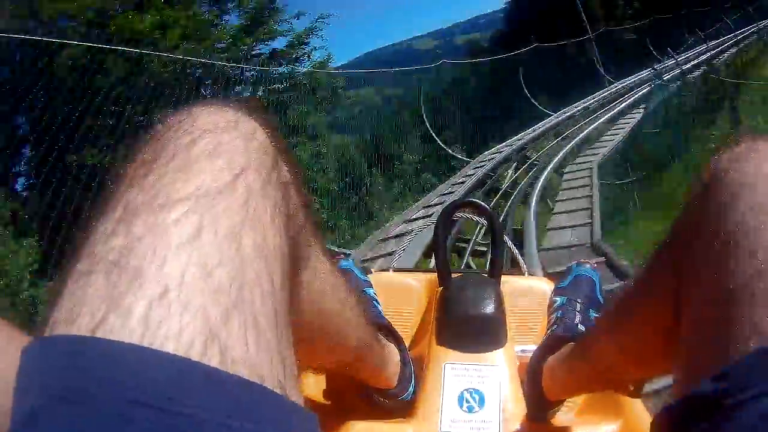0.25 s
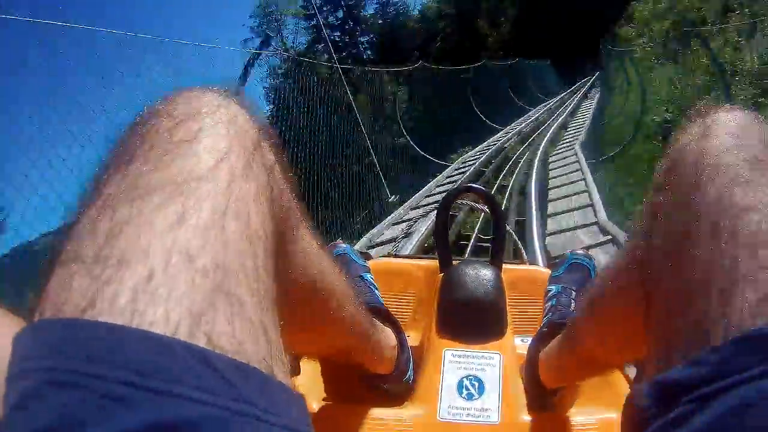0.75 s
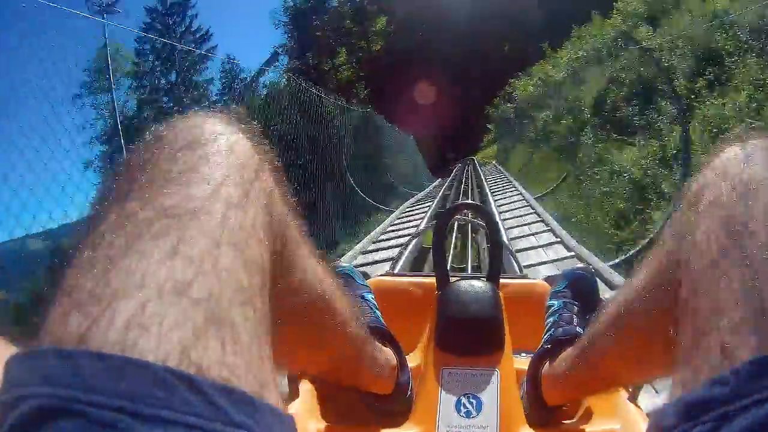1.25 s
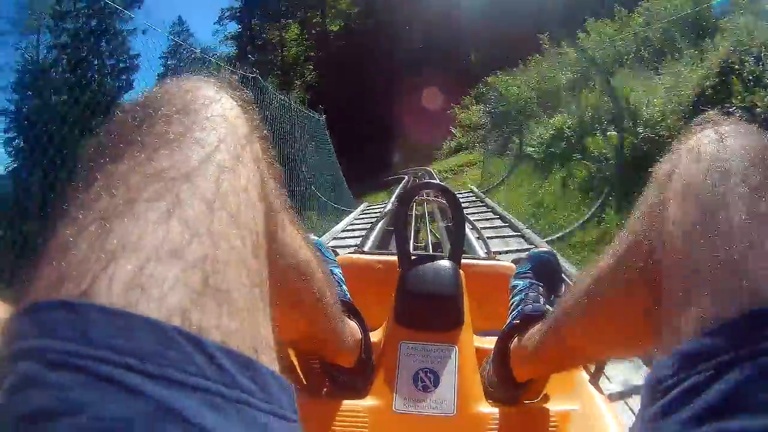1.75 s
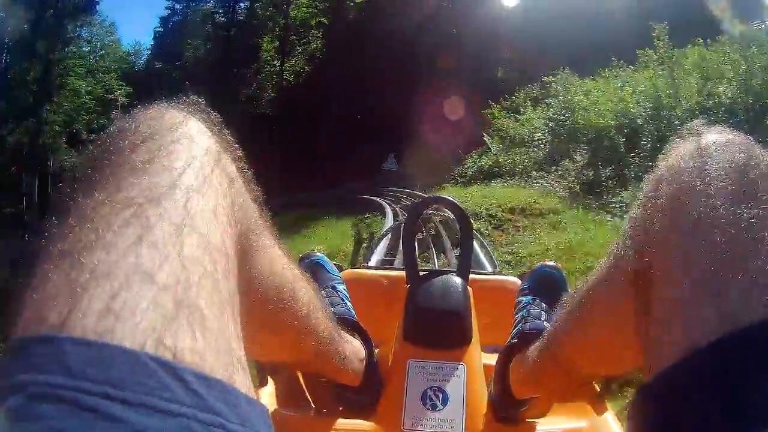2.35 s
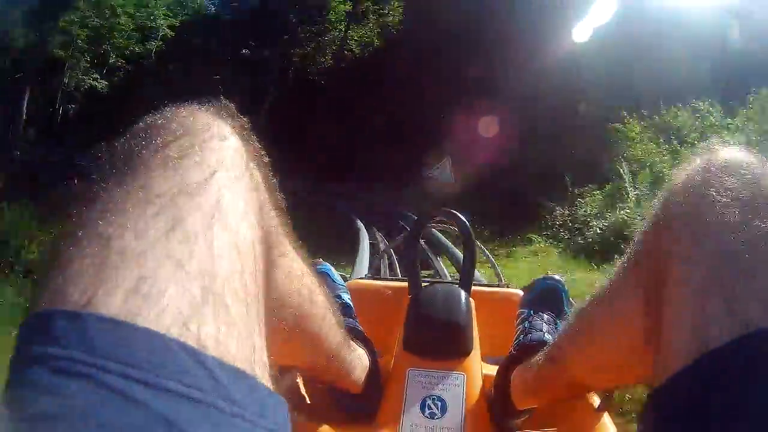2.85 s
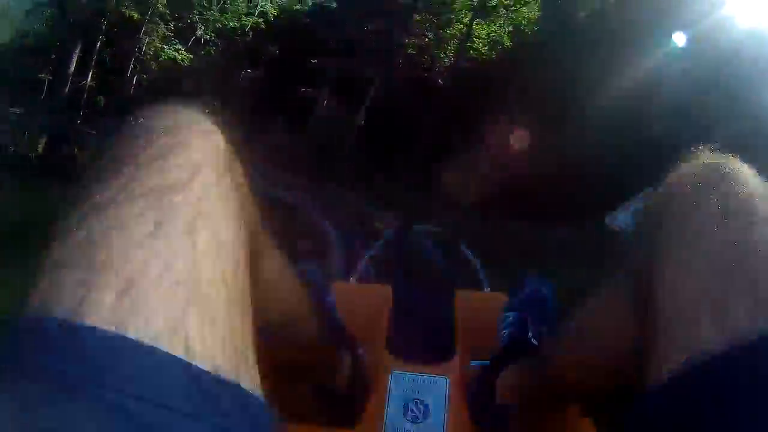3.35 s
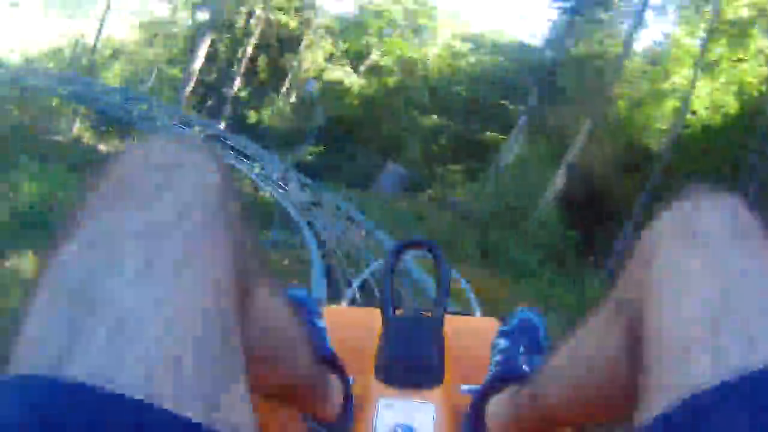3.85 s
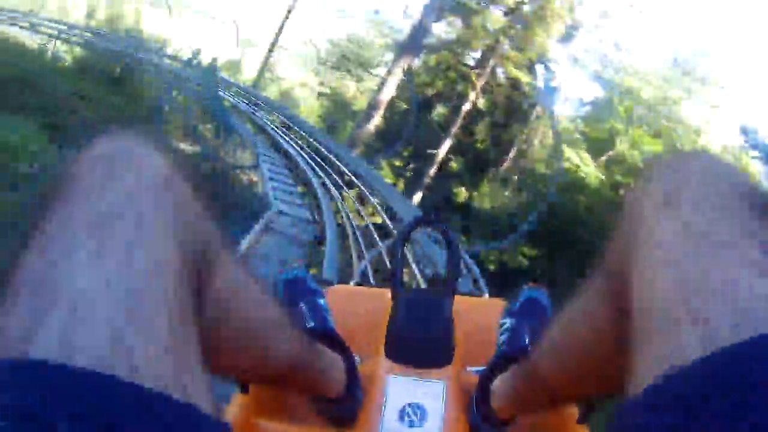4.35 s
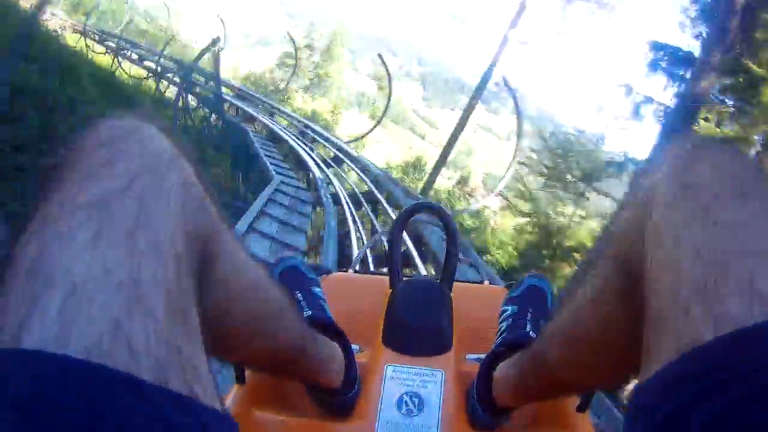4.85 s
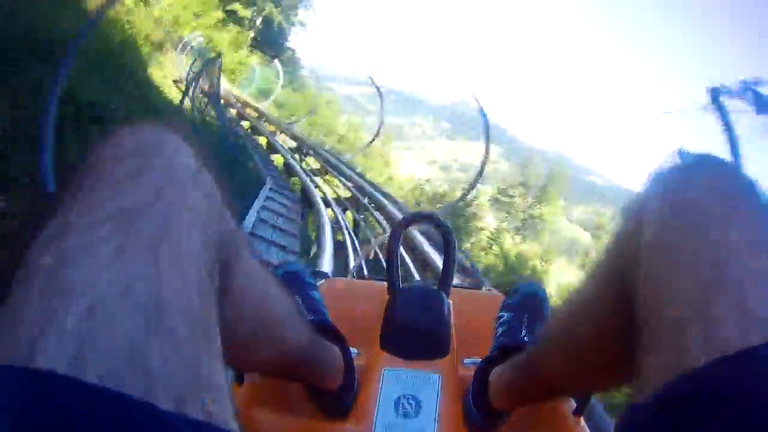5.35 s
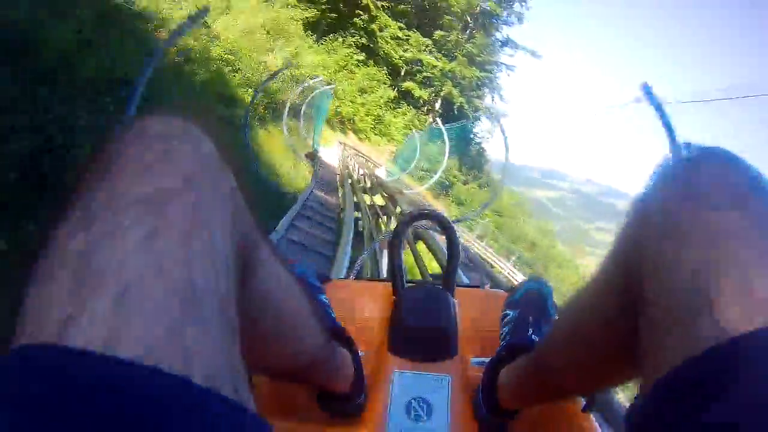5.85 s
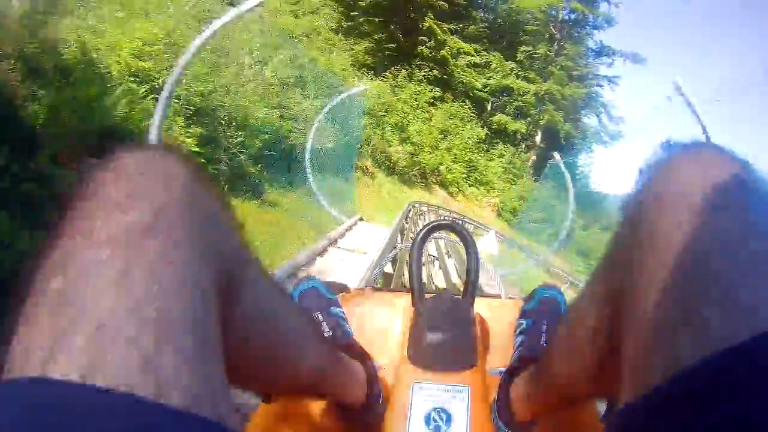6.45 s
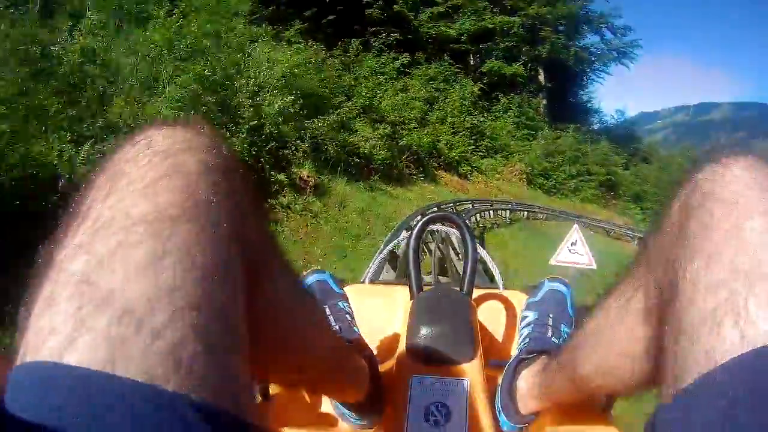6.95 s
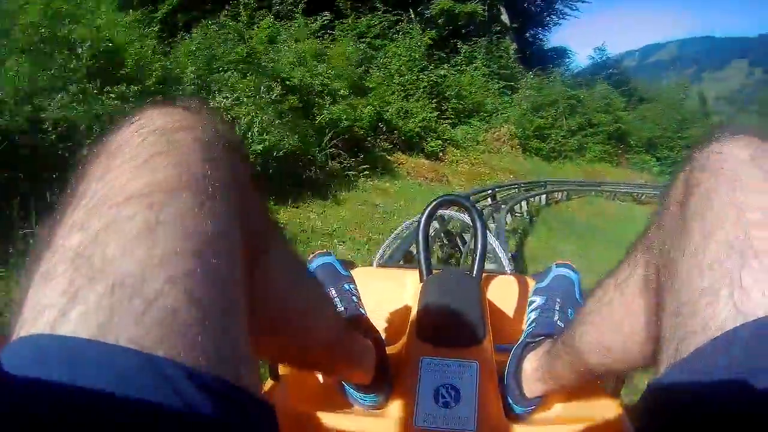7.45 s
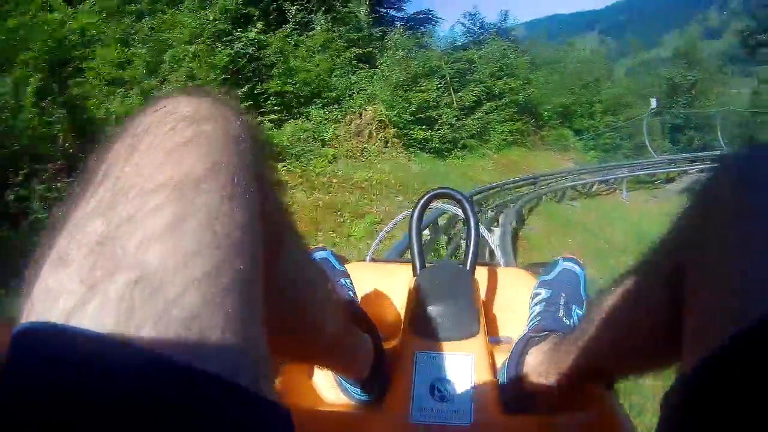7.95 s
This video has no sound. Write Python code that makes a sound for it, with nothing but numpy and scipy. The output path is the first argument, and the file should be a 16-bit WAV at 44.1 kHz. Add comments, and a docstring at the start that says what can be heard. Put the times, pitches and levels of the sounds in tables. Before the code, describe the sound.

Wheels rumble and whine along a steel coaster track, with irregular clacks, knocks on the plastic sled and buffeting wind.

```python
"""Mountain coaster, rider's seat: a sled rolls down steel rails.
Its wheels roar, whine and hum through the plastic shell; the hum sinks as the sled slows.
Flanges scuff and ring the rail, slipping wheels squeal, wind buffets the microphone.
Wheels clack over track edges and three times lift and drop in a quick double clack.
Soft jolts rock the chassis; four hard ones knock the shell. A faint hiss lies under it all."""
import sys
import numpy as np
from scipy import signal
from scipy.fft import rfft, irfft, next_fast_len
from scipy.io import wavfile
from scipy.ndimage import uniform_filter1d, map_coordinates

SR = 44100
rng = np.random.default_rng(int(sys.argv[2]) if len(sys.argv) > 2 else 0)


def materialize(psi):
    """Save the field psi as 16-bit PCM at rate SR to the path in sys.argv[1].

    A 1-D psi becomes a single channel; in a 2-D psi each row is a channel.
    """
    bounded = np.clip(np.atleast_2d(psi).T, -1, 1)
    quanta = np.round(bounded * 32767).astype(np.int16)
    wavfile.write(sys.argv[1], SR, quanta)


N = 361179

# rolling roar (time [s], relative level [dB])
ROAR_LEVEL = [(0.0, -49.5), (0.23, -50.5), (0.46, -52), (0.93, -53.5), (1.25, -50), (1.37, -51),
              (3.53, -53.5), (5.34, -50.5), (7.39, -54.5), (8.19, -53.5)]
# roar spectrum (frequency [Hz], relative density [dB])
ROAR_SPECTRUM = [(60, 2.5), (130, -1), (220, -1), (290, 0.5), (360, -1.5), (440, -0.5), (550, -8.5),
                 (630, -4), (700, -7), (780, -3), (900, -11), (1040, -7.5), (1180, -7), (1260, -11),
                 (1400, -10.5), (1770, -12.5), (1930, -8), (2200, -18.5), (3200, -24.5), (7000, -43.5)]
# rail resonances (frequency [Hz], width [Hz], relative level [dB])
RAIL_MODES = [(4040, 99, -1), (4305, 190, 0), (5010, 400, -9), (5930, 320, -10), (7900, 130, -11.5),
              (10600, 930, -15)]
# wheel whine (time [s], level [dB])
WHINE_LEVEL = [(0.0, -46), (0.36, -52.5), (0.8, -57), (1.3, -55), (2.64, -54.5), (3.45, -56.5), (5.31, -53),
               (5.57, -55.5), (7.48, -55.5), (8.19, -56.5)]
# wheel whine (time [s], centre pitch [Hz])
WHINE_PITCH = [(0.0, 1395), (2.0, 1455), (2.9, 1387), (5.36, 1450), (6.43, 1388), (8.19, 1406)]
# wheel hum (time [s], relative level [dB])
HUM_LEVEL = [(0.0, -38.5), (0.41, -60.5), (1.39, -39), (1.71, -54.5), (2.49, -41.5), (2.78, -55.5),
             (3.17, -65), (4.61, -49.5), (5.13, -68), (6.66, -44.5), (6.82, -52.5), (8.19, -46)]
# wind buffeting (time [s], relative level [dB])
BUFFET_LEVEL = [(0.0, -37.5), (0.6, -43), (0.87, -45), (1.15, -40.5), (1.45, -46.5), (1.78, -42.5),
                (1.92, -61.5), (2.7, -49), (3.2, -57.5), (3.8, -44), (5.1, -48), (5.9, -46), (7.2, -53.5),
                (8.19, -49)]
# buffeting spectrum (frequency [Hz], relative density [dB])
BUFFET_SPECTRUM = [(10, -9), (25, 5), (55, -1.5), (90, -7), (140, -13), (220, -20.5), (500, -53),
                   (1500, -89)]
# flange scrapes (peak time [s], level [dB], 1/e half-width [s], fizz re scrape [dB])
SCRAPES = [(0.062, -45, 0.02, -24), (0.136, -45, 0.025, -29), (1.08, -44.5, 0.007, -6),
           (1.125, -46, 0.0064, -8), (1.168, -45, 0.0052, -2), (1.186, -45.5, 0.11, -17),
           (1.444, -52, 0.03, -7), (1.7, -49, 0.099, -11), (2.535, -49.5, 0.03, -20),
           (2.727, -51, 0.03, -3.5), (2.832, -48.5, 0.031, -17), (3.648, -47, 0.033, -11),
           (3.708, -40.5, 0.033, -6), (5.91, -46, .035, -27), (6.421, -51, 0.0086, -3.5),
           (6.597, -47.5, 0.0082, -12), (6.63, -45, 0.024, -21), (6.692, -47.5, 0.016, -14),
           (6.774, -43, 0.025, -24), (6.839, -43, 0.014, -13), (7.407, -48, 0.011, -12),
           (7.719, -53, 0.016, -3), (8.119, -51, 0.027, -26)]
# flange rub spectrum (frequency [Hz], relative density [dB])
SCUFF_SPECTRUM = [(400, 5), (900, 1), (1400, 12), (2000, 6), (2500, -3.5), (3400, -15), (4200, -4.5),
                  (4800, -32), (8000, -30), (15000, -54)]
# flange fizz spectrum (frequency [Hz], relative density [dB])
FIZZ_SPECTRUM = [(2500, 12), (4200, 8), (7000, -2.5), (11500, -8.5), (15500, -36)]
# hiss spectrum (frequency [Hz], relative density [dB])
HISS_SPECTRUM = [(1470, -7.5), (2500, 5.5), (3560, -35), (4210, -8), (5640, -10), (6140, -4.5),
                 (11300, -8.5), (14500, -11), (15700, -32)]
# single wheel clacks (time [s], relative level [dB], ring [Hz], low-pass [Hz], relative shake [dB])
CLACKS = [(.017, -23, 1930, 2250, -2), (0.3382, -13.5, 1980, 2390, -13.5), (0.849, -18, 1970, 2200, -6),
          (1.1651, -25.5, 1400, 3460, 0.5), (1.318, -15.5, 3700, 4200, -8.5), (1.4624, -25, 1340, 1650, 1),
          (1.602, -31.5, 370, 700, -11), (1.759, -25.5, 693, 1190, 2), (2.539, -26.5, 506, 1790, 2.5),
          (3.7, -32, 420, 900, 7), (3.752, -25, 3240, 6560, 2.5), (3.758, -23.5, 795, 2200, 2),
          (3.7923, -22.5, 3320, 2320, -2.5), (4.079, -27.5, 2730, 1700, -1),
          (5.5565, -21.5, 1810, 5910, -1), (5.9715, -22.5, 1150, 1990, -0.5), (6.027, -26, 2080, 4000, -2),
          (6.735, -30.5, 356, 700, -2)]
# wheel carriage modes (frequency [Hz], relative level [dB], t60 [s])
CARRIAGE_MODES = [(136, -7.5, 0.13), (438, -1, 0.018), (676, -5.5, 0.0035), (810, 8, 0.005),
                  (1466, -3.5, 0.035), (1960, -16, 0.024), (3300, -8, 0.014), (4400, -18, 0.0076),
                  (5300, -14, 0.0056), (7970, 1.5, 0.005)]
# clack rattle spectrum (frequency [Hz], relative density [dB])
RATTLE_SPECTRUM = [(300, 1), (600, 11), (1200, 6), (2100, 15.5), (2600, -6), (3300, 5), (3800, 5),
                   (4400, 5), (6200, -1), (8000, -17)]
# wheel squeals (peak time [s], level [dB], 1/e half-width [s], pitch [Hz], glide [Hz/s])
SQUEALS = [(0.061, -38, 0.025, 1375, 199), (0.153, -46, 0.014, 1370, 4), (0.227, -47, 0.096, 1405, -100),
           (0.201, -60, 0.19, 1910, -350), (0.318, -54.5, 0.06, 1070, 246), (0.334, -52, 0.035, 1625, 202),
           (3.63, -43, 0.0084, 1380, 2), (7.497, -42, 0.013, 1440, 1198.5)]
# soft chassis bumps (time [s], relative level [dB], pitch [Hz])
BUMPS = [(0.109, -17.5, 61), (0.531, -26.5, 157), (0.604, -17.5, 56), (1.03, -23, 89), (1.093, -18.5, 59),
         (1.321, -20.5, 164), (1.383, -21.5, 96), (1.601, -29.5, 200), (1.698, -26.5, 151),
         (2.708, -27, 66), (3.697, -23.5, 133), (3.789, -27.5, 162), (4.24, -25, 39), (6.678, -22, 101),
         (6.738, -27, 194), (7.531, -28, 142), (8.067, -28.5, 96), (8.152, -32, 95)]
# hard shell knocks (time [s], relative level [dB], low-pass [Hz], relative thud [dB])
KNOCKS = [(1.2096, 0.5, 4370, -3), (1.3034, -8, 2270, 2.5), (1.793, -8, 2300, -1), (6.033, -9, 2230, -3)]
# shell modes (frequency [Hz], relative level [dB], t60 [s])
SHELL_MODES = [(392, -16, 0.022), (800, -13, 0.0053), (1228, -20, 0.079), (1412, -9.5, 0.031),
               (1500, 0, 0.0072), (1890, -12, 0.016), (2395, -28, 0.015), (3630, -17, 0.0094),
               (3980, -29, 0.0086), (6450, -18, 0.0046)]
# seat modes (frequency [Hz], relative level [dB], t60 [s])
SEAT_MODES = [(101, -13.5, 0.018), (170, -9, 0.022), (287, -5.5, 0.014)]
# knock crack spectrum (frequency [Hz], relative density [dB])
CRACK_SPECTRUM = [(900, -4), (1750, 7), (2150, 14), (2900, 3.5), (3800, -5.5), (4800, -8), (6600, -20),
                  (9000, -20)]
# double clacks (time [s], relative lift level [dB], delay to drop [s])
DOUBLE_CLACKS = [(4.7585, -19.5, 0.018), (5.2833, -12.5, 0.041), (5.4218, -21, .0426)]
# modes of a wheel lifting against the rail (frequency [Hz], relative level [dB], t60 [s])
LIFT_MODES = [(437, 3, 0.0043), (765, -6, 0.012), (1504, -1, .015), (2060, -15, 0.032), (3270, -8.5, .012),
              (3630, -11, 0.0094), (4570, -15, .01), (4970, -9, 0.0078), (5540, -12.5, 0.0083),
              (7400, -17, 0.0074), (8050, -14.5, 0.0066)]
# modes of a wheel dropping back (frequency [Hz], relative level [dB], t60 [s])
DROP_MODES = [(570, 4, 0.0059), (865, -4.5, 0.0067), (1650, -17, 0.025), (1883, 0, 0.01),
              (2530, -14.5, .012), (3250, -11, 0.0069), (4320, -10, 0.0078), (5100, -18, 0.0066),
              (7000, -25, .005)]


def amp(db):
    """Decibels to gain."""
    return 10 ** (np.asarray(db) / 20)


def unit(x):
    """Scale to rms 1."""
    return x / np.sqrt(np.mean(x ** 2) + 1e-20)


def curve(points):
    """(time [s], value) points to one value per sample."""
    return np.interp(np.arange(N) / SR, *np.transpose(points))


def wobble(knots_per_s):
    """Smooth random curve, rms near 1."""
    knots = rng.standard_normal(8192)
    return map_coordinates(knots, [np.arange(N) * knots_per_s / SR], mode="wrap")


def phase_rad(hz):
    """Running phase of a varying pitch."""
    return 2 * np.pi * np.cumsum(hz) / SR


def swell(peak_s, half_width_s):
    """Gaussian envelope, peak 1."""
    return np.exp(-np.minimum(((np.arange(N) / SR - peak_s) / half_width_s) ** 2, 20))


def scattered(events_per_s):
    """Poisson events (time [s], normal deviate, normal deviate)."""
    draws = rng.standard_normal((64, 4))
    times_s = np.cumsum(draws[:, 0] ** 2 + draws[:, 1] ** 2) / (2 * events_per_s)
    return np.column_stack([times_s, draws[:, 2:]])[times_s < N / SR]


def filtered(x, response):
    """Apply response(hz) by FFT."""
    size = next_fast_len(len(x) + SR // 4)
    return irfft(rfft(x, size) * response(np.fft.rfftfreq(size, 1 / SR)), size)[:len(x)]


def coloured(x, spectrum):
    """Shape x by a spectrum table; rms 1."""
    points_hz, db = np.transpose(spectrum)
    return unit(filtered(x, lambda hz: amp(np.interp(np.log(hz + 1), np.log(points_hz), db))))


def patchy(depth_db):
    """Noise whose level drifts in time-frequency patches."""
    bins = signal.stft(rng.standard_normal(N), nperseg=512)[2]
    patches = uniform_filter1d(rng.standard_normal(bins.shape), size=4, axis=0)
    patches = uniform_filter1d(patches, size=12, axis=1)
    return signal.istft(bins * amp(depth_db * unit(patches)))[1][:N]


def ring(modes, t, spread_db=1):
    """Damped modes; strengths vary per strike."""
    hz, db, t60_s = np.transpose(modes)[:, :, None]
    struck_db = db + spread_db * rng.standard_normal(db.shape)
    return np.sum(amp(struck_db - 60 * t / t60_s) * np.sin(2 * np.pi * hz * t), axis=0)


def soften(x, cutoff_hz):
    """Low-pass: a softer contact passes less treble."""
    return signal.lfilter(*signal.butter(2, min(cutoff_hz, SR / 3), fs=SR), x)


def saturate(x, ceiling):
    """Round off peaks near the ceiling."""
    return x / (1 + np.abs(x / ceiling) ** 4) ** (1 / 4)


def add(track, start_s, sound):
    """Mix a sound in at start_s."""
    part = track[round(start_s * SR):][:len(sound)]
    part += sound[:len(part)]


def rolling():
    """Wheels on rough steel: juddering roar in the shell, thin ring in the rails."""
    roar_db = curve(ROAR_LEVEL)
    judder = wobble(36)
    roar_gain = amp(roar_db + 3.5 + 0.92 * judder + 1.75 * wobble(250))
    roar = roar_gain * coloured(patchy(depth_db=1.5), ROAR_SPECTRUM)
    rail_db = -68.5 + 0.84 * (roar_db - roar_db.mean()) + 2.8 * judder
    return roar + amp(rail_db) * rail_ring()


def rail_ring(note_hz=4220, waver_hz=54.8, note_db=-5):
    """Steel rail: noise in its resonances plus one wavering note; rms 1."""
    def steel(hz):
        return sum(amp(db) * 1j * hz * width_hz / (mode_hz ** 2 - hz ** 2 + 1j * hz * width_hz)
                   for mode_hz, width_hz, db in RAIL_MODES)

    phase = phase_rad(note_hz + waver_hz * wobble(70))
    note = amp(note_db) * unit(amp(5 * wobble(45)) * np.sin(phase))
    resonances = unit(filtered(rng.standard_normal(N), steel))
    return unit(resonances + note)


def wheel_whine():
    """Spinning wheels, slightly apart in pitch: a fuzzy, fluttering whine."""
    centre_hz = curve(WHINE_PITCH)
    whine = np.zeros(N)
    for offset_hz in (-55, 55):
        phase = phase_rad(centre_hz + offset_hz + 14 * wobble(24))
        whine += wobble(140) * np.sin(phase) + wobble(140) * np.cos(phase)
    return amp(curve(WHINE_LEVEL) + 1.6 * wobble(55)) * unit(whine)


def wheel_hum(fast_hz=90, slow_hz=77.9, slowing_s=(0.96, 3.3)):
    """Low wheel hum; pitch falls with speed."""
    hum_hz = np.interp(np.arange(N) / SR, slowing_s, (fast_hz, slow_hz))
    phase = phase_rad(hum_hz + 2.16 * wobble(20))
    return amp(curve(HUM_LEVEL) + 1.7 + 2.34 * wobble(18)) * unit(np.sin(phase))


def wind(sway_hz=8, sway_width_hz=6):
    """Air tumbles over the microphone in lumps, on a slow pressure sway."""
    lumps = amp(3.8 * wobble(32))
    buffet = coloured(rng.standard_normal(N) * lumps, BUFFET_SPECTRUM)
    sway = filtered(rng.standard_normal(N), lambda hz: np.exp(-((hz - sway_hz) / sway_width_hz) ** 2))
    return amp(curve(BUFFET_LEVEL) + 6.5) * buffet + amp(-41.5) * unit(sway)


def flange_scrapes(scuff_db=-64, ring_db=-67):
    """Flanges brush the rail throughout; short, harder rubs ring it, some with a bright fizz."""
    rub_gain = amp(scuff_db + 3.5 * wobble(14))
    fizz_gain = amp(-3.5) * rub_gain
    touch = np.zeros(N)  # light and heavy scrapes ring the rail alike
    for peak_s, db, half_width_s, fizz_db in SCRAPES:
        contact = swell(peak_s, half_width_s)
        touch = np.maximum(touch, contact)
        rub_gain += amp(db) * contact
        fizz_gain += amp(db + fizz_db) * contact
    stick_slip = amp(2 * wobble(300))
    rub = rub_gain * coloured(stick_slip * patchy(depth_db=2), SCUFF_SPECTRUM)
    fizz = fizz_gain * coloured(stick_slip * rng.standard_normal(N), FIZZ_SPECTRUM)
    return rub + fizz + amp(ring_db) * touch * rail_ring()


def hiss(level_db=-69):
    """Faint steady hiss."""
    return amp(level_db) * coloured(rng.standard_normal(N), HISS_SPECTRUM)


def clacks(rise_s=0.00024, rattle_t60_s=0.018):
    """A wheel strikes a track edge, rings briefly and shakes the carriage."""
    out, t = np.zeros(N), np.arange(SR // 10) / SR
    attack = 1 - np.exp(-t / rise_s)
    for start_s, db, ring_hz, cutoff_hz, shake_db in CLACKS:
        t60_s = 30 / ring_hz
        note = ring([(ring_hz, -1, t60_s)], t)
        rattle = amp(-60 * t / rattle_t60_s) * coloured(rng.standard_normal(len(t)), RATTLE_SPECTRUM)
        shake = amp(-2) * ring(CARRIAGE_MODES, t) + amp(0.5) * rattle
        blow = attack * (note + amp(shake_db) * shake)
        add(out, start_s, amp(db - 6.5) * soften(blow, cutoff_hz))
    return out


def squeals(waver_hz=14.8, flutter_db=3):
    """A wheel slips sideways in a bend: a thin, wavering note."""
    out, t = np.zeros(N), np.arange(N) / SR
    for peak_s, db, half_width_s, hz, glide_hz_per_s in SQUEALS:
        phase = phase_rad(hz + glide_hz_per_s * (t - peak_s) + waver_hz * wobble(60))
        out += amp(db) * swell(peak_s, half_width_s) * np.sqrt(2) * np.sin(phase)
    return out * amp(flutter_db * wobble(90))


def chassis_bumps(jiggle_db=-37.5, jiggle_hz=150, spread_octaves=0.27):
    """Soft jolts rock the chassis for a few cycles; small random jiggles fall between."""
    out, t = np.zeros(N), np.arange(SR // 5) / SR
    jiggles = [(start_s, jiggle_db + 2 * size, jiggle_hz * 2 ** (spread_octaves * pitch))
               for start_s, size, pitch in scattered(events_per_s=1.4)]
    for start_s, db, hz in BUMPS + jiggles:
        cycles = hz * t
        envelope = np.exp(-cycles / 1.15) * (1 - np.exp(-cycles / 0.026))
        add(out, start_s, amp(db) * envelope * np.sin(2 * np.pi * cycles))
    return out


def shell_knocks(crack_t60_s=0.024, shudder_t60_s=0.027):
    """Hard jolts ring the hollow shell and thud in the seat."""
    out, t = np.zeros(N), np.arange(SR // 5) / SR
    for start_s, db, cutoff_hz, thud_db in KNOCKS:
        crack = amp(-12 - 60 * t / crack_t60_s) * coloured(rng.standard_normal(len(t)), CRACK_SPECTRUM)
        low_noise = unit(soften(rng.standard_normal(len(t)), cutoff_hz=650))
        shudder = amp(-18 - 60 * t / shudder_t60_s) * low_noise
        blow = ring(SHELL_MODES, t) + amp(thud_db) * ring(SEAT_MODES, t) + crack + shudder
        add(out, start_s, amp(db) * soften(blow, cutoff_hz))
    return out


def double_clacks(rise_s=0.00061, drop_db=-12, spread_db=2.2):
    """A wheel lifts against the rail and drops back; each contact has its own modes."""
    out, t = np.zeros(N), np.arange(SR // 10) / SR
    attack = 1 - np.exp(-t / rise_s)
    for start_s, lift_db, delay_s in DOUBLE_CLACKS:
        add(out, start_s, amp(lift_db) * attack * ring(LIFT_MODES, t, spread_db))
        add(out, start_s + delay_s, amp(drop_db) * attack * ring(DROP_MODES, t, spread_db))
    return out


def scene(blow_cutoff_hz=8300):
    """Mono mix. The hardest blows saturate; the blows are low-passed, so they have no top treble."""
    running = hiss() + rolling() + flange_scrapes() + wheel_whine() + wheel_hum() + squeals() + wind()
    blows = saturate(shell_knocks() + chassis_bumps() + clacks() + double_clacks(), ceiling=0.77)
    blow_lowpass = signal.butter(8, blow_cutoff_hz, fs=SR, output="sos")
    return (running + signal.sosfilt(blow_lowpass, blows))[None]


def record(dry):
    """Brick-wall band limit."""
    top_hz = 15700
    return filtered(dry[0], lambda hz: hz < top_hz)[None]


dry = scene()
out = record(dry)
materialize(out)
```